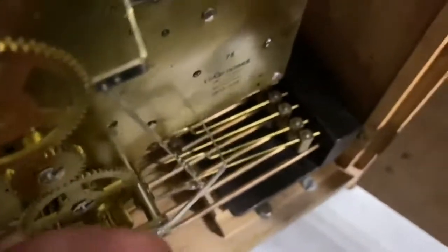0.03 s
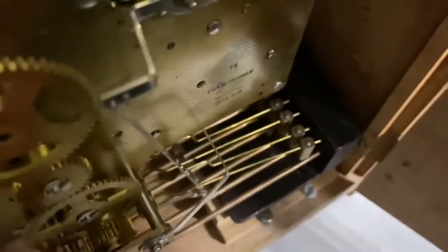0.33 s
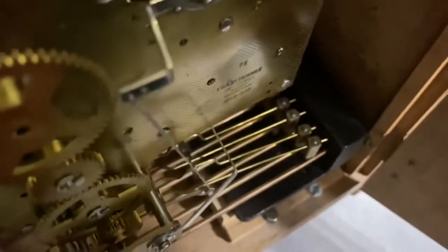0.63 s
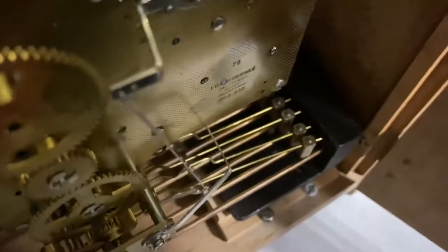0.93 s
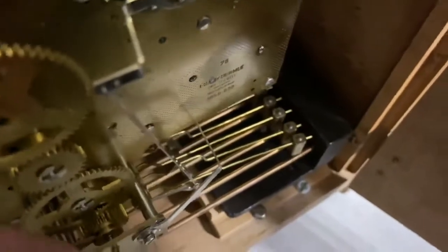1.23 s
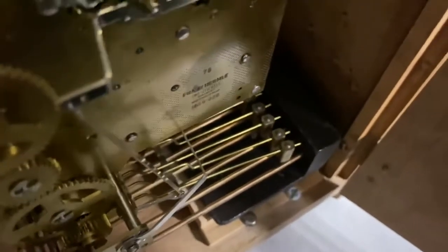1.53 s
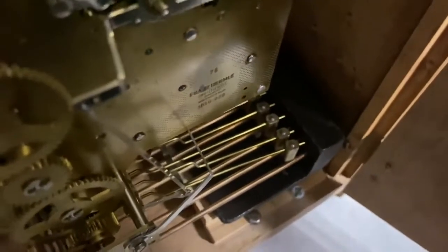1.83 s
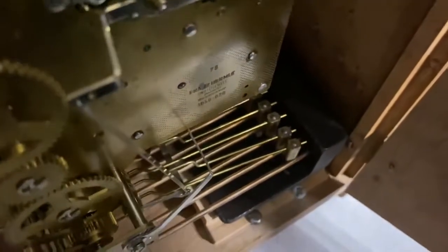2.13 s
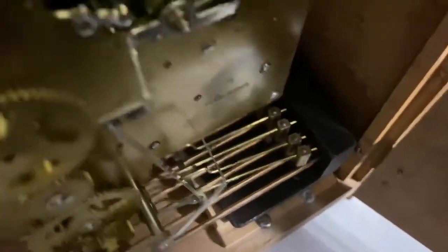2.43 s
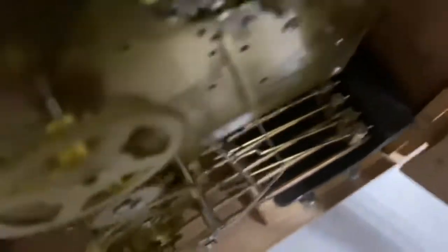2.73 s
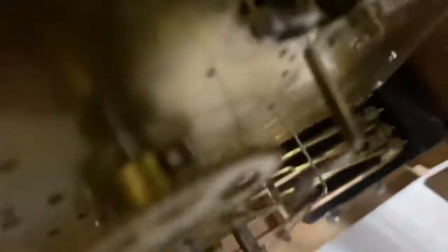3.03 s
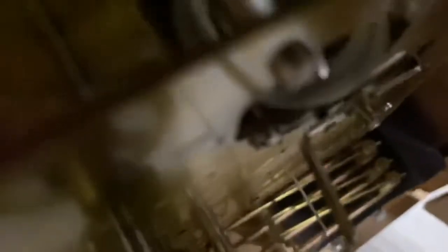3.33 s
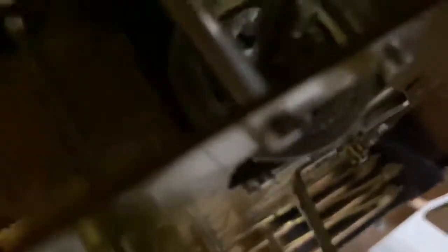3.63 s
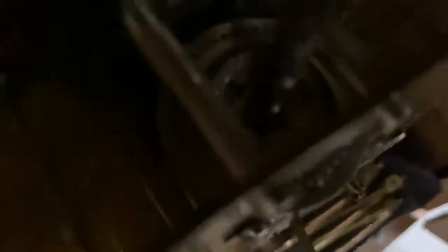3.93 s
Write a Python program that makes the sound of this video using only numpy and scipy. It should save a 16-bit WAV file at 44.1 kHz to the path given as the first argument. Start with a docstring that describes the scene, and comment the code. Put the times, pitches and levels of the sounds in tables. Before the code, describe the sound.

Close up in a softly humming room, a clock movement clacks once and ticks sparsely as its levers shift. Sharper clicks follow, the gears spin up to a steady whirr, and a single chime rings in the wooden case.

```python
"""A brass clock movement in a wooden case, close by in a humming room, reaching the left microphone first.
At 0.4 s the trip lever drops with a clack that booms in the case. Levers slide and click, then release
the strike train at 2.2 s. Its meshing teeth run up to a steady whirr, with two knocks on the way.
At 3.75 s a hammer falls on a chime rod and touches it again; the rod rings and the case shudders."""
import sys
import numpy as np
from scipy import signal
from scipy.fft import rfft, irfft
from scipy.io import wavfile
from scipy.ndimage import uniform_filter1d

SR = 44100
rng = np.random.default_rng(int(sys.argv[2]) if len(sys.argv) > 2 else 0)


def wav_out(sig):
    """Save sig, one row per channel (or a flat mono array), as 16-bit PCM at SR to the path in sys.argv[1]."""
    wavfile.write(sys.argv[1], SR, np.round(np.clip(np.atleast_2d(sig).T, -1, 1) * 32767).astype(np.int16))


N = 176400
MIC_LAG_S, LEVER_COHERENCE = 0.0004725, 0.59
TOOTH_SCATTER_DB = 1.5
# stereo balance of gears and case: f/Hz, left minus right/dB
MOVEMENT_BALANCE = [(150, 4.5), (600, 4.5), (1150, 4), (1600, 1), (2800, 0), (3900, 5), (4700, 5),
                    (6300, 0.5), (8500, 1), (10000, -0.5), (15000, 0)]


def undb(db):
    """Decibels to gain."""
    return 10 ** (np.asarray(db) / 20)


def curve(rows):
    """Straight lines through (t/s, value) rows."""
    return np.interp(np.arange(N) / SR, *np.array(rows, float).T)


def wander(rate_hz):
    """Smooth random drift, spread near 1."""
    k = int(SR / rate_hz)
    steps = np.repeat(rng.standard_normal(N // k + 1), k)
    return 1.04 * uniform_filter1d(uniform_filter1d(steps, k), k)[:N]


def band_gain(points):
    """Gain per FFT bin from (f/Hz, level/dB) points."""
    hz, db = np.array(points, float).T
    return undb(np.interp(np.log(np.arange(N // 2 + 1) * SR / N + 1), np.log(hz), db))


def colour(x, points):
    """Minimum-phase filter that keeps the power of white noise."""
    gain, n = band_gain(points), np.arange(N)
    cepstrum = irfft(np.log(gain / np.sqrt(np.mean(gain ** 2))), N)
    causal_fold = 1 + np.sign(N / 2 - n) * (n > 0)
    return irfft(rfft(x) * np.exp(rfft(cepstrum * causal_fold)), N)


def resonate(x, hz, width_hz):
    """One resonance, unit gain at its centre."""
    return signal.lfilter(*signal.iirpeak(hz, hz / width_hz, fs=SR), x)


def narrow_noise(hz, width_hz):
    """Noise-driven resonance at unit RMS."""
    x = resonate(resonate(rng.standard_normal(N), hz, width_hz), hz, width_hz)
    return x / np.std(x)


def noise_pair(coherence):
    """Partly correlated left and right noise."""
    common = np.sqrt(coherence) * rng.standard_normal(N)
    return common + np.sqrt(1 - coherence) * rng.standard_normal((2, N))


def pan(db):
    """Left and right gains for a level difference."""
    return undb(np.array([[db], [-db]]) / 2)


def mics(x, balance=((100, 0), (1000, 0))):
    """Two microphones, balanced by band; the right one lags, but the top treble is in step."""
    gain, hz = np.sqrt(band_gain(balance)), np.arange(N // 2 + 1) * SR / N
    lag_cycles = np.minimum(hz * MIC_LAG_S, 3)
    return irfft(rfft(x) * np.array([gain, np.exp(-2j * np.pi * lag_cycles) / gain]), N)


def fade(t, t60_s):
    """Exponential decay from t = 0."""
    return (t >= 0) * np.exp(-np.log(1000) * np.maximum(t, 0) / t60_s)


def attack(t, rise_ms):
    """Build-up of a contact, 0 to 1."""
    return 1 - np.exp(-(np.maximum(t, 0) * 1000 / rise_ms) ** 2)


def ring(modes, t, tilt_db_oct=0):
    """Struck modes of alternating sign at both microphones, tilted about 600 Hz."""
    t = np.array([t, t - MIC_LAG_S])
    out = 0
    for k, (hz, db, t60_s, pan_db) in enumerate(modes):
        gain = (-1) ** k * undb(db + tilt_db_oct * np.log2(hz / 600)) * pan(pan_db)
        out += gain * fade(t, t60_s) * np.sin(2 * np.pi * hz * t)
    return out


def add(out, start_s, sound):
    """Mix a sound in at start_s."""
    at = int(start_s * SR)
    out[..., at:at + sound.shape[-1]] += sound[..., :N - at]


def gears():
    """Meshing teeth pulse a noise that rings wheels and plates; a thin whine follows the speed."""
    # train speed: t/s, tooth rate/Hz
    speed = [(2.24, 50), (2.35, 95), (2.45, 124), (2.6, 150), (2.75, 180), (2.9, 204), (3.05, 215),
             (3.3, 221), (3.55, 211), (3.72, 214), (4, 208)]
    # whirr spectrum: f/Hz, level/dB
    spectrum = [(150, 3), (260, 7.5), (560, 2.5), (850, 3), (1150, 8.5), (1550, 0.5), (2200, 0.5),
                (2900, 3), (3500, 7), (4650, -4.5), (5500, -5), (6500, -1.5), (7600, -6.5), (8600, -2),
                (9300, -3.5), (10150, 2), (10900, -8.5), (12200, -13), (14000, -1.5), (15100, -15),
                (15700, -8)]
    # wheel resonances: f/Hz, width/Hz, level/dB
    wheel_modes = [(1043, 17, 10.5), (1286, 15, -9), (1865, 40, 6), (2660, 23, -3)]
    # their gain: t/s, level/dB
    wheel_gain = [(2.3, -5), (2.7, 10), (2.95, -5), (3.3, 1.5), (3.6, 10.5), (4, 14.5)]
    # plate resonances: f/Hz, width/Hz, level/dB
    plate_modes = [(3847, 120, 5.5), (4050, 78, 3), (4544, 83, 6.5), (6070, 300, -10)]
    # their gain: t/s, level/dB
    plate_gain = [(2.3, -9), (2.55, -2), (2.8, 5), (3.3, 5.5), (3.55, 1.5), (4, 7)]
    # whine tones: multiple of tooth rate, level/dB, left minus right/dB
    tones = [(.4, -53.5, 2), (5, -53.5, 17)]
    start_s, full_speed_hz = speed[0][0], 215
    t, tooth_hz = np.arange(N) / SR, curve(speed)
    teeth = np.cumsum(tooth_hz) / SR
    drive = np.clip((t - start_s) / 0.036, 0, 1) * (tooth_hz / full_speed_hz) ** 1.07
    force = undb(TOOTH_SCATTER_DB * rng.standard_normal(N // 100))[teeth.astype(int)]
    pulses = .8 + force * np.exp(-(teeth % 1) / .25)  # steady bed plus one pulse per tooth
    mesh = noise_pair(0.31) * pulses / np.sqrt(np.mean(pulses ** 2))
    whirr = colour(mesh, spectrum)
    for modes, gain in (wheel_modes, wheel_gain), (plate_modes, plate_gain):
        ringing = sum(undb(db) * resonate(mesh, hz, width_hz) for hz, width_hz, db in modes)
        whirr += ringing * undb(curve(gain))
    whirr = undb(-45.5) * mics(whirr, MOVEMENT_BALANCE)
    cycles = teeth + .035 * wander(60) - np.array([[0], [MIC_LAG_S]]) * tooth_hz
    whine = sum(undb(db + 3 * wander(30.32)) * pan(pan_db) * np.sin(2 * np.pi * k * cycles)
                for k, db, pan_db in tones)
    return drive * whirr + drive ** 6 * whine + tooth_ticks(teeth, start_s)


def tooth_ticks(teeth, start_s):
    """Each tooth lands with a tiny tick, hard or soft as a slower wheel comes round."""
    # metallic tick modes: f/Hz, level/dB, t60/s
    modes = [(6480, -40.5, .006), (10200, -35, .006)]
    # tick gain: t/s, level/dB
    gain = [(2.3, -31), (2.65, -17), (2.8, -0.5), (3.45, 5.5), (3.65, -1), (4, -14)]
    t, turns_per_tooth = np.arange(SR // 50) / SR, .282
    landings = np.diff(np.floor(teeth), prepend=0) * (np.arange(N) / SR > start_s)
    pressure = (1 + np.sin(2 * np.pi * turns_per_tooth * teeth)) / 2
    blows = landings * pressure * undb(curve(gain) + TOOTH_SCATTER_DB * rng.standard_normal(N))
    tick = sum(undb(db) * fade(t, t60_s) * np.sin(2 * np.pi * hz * t) for hz, db, t60_s in modes)
    return mics(signal.fftconvolve(blows, attack(t, rise_ms=.7) * tick)[:N])


def chime(strike_s, retouch_s):
    """The rod rings in beating pairs; the hammer's second touch shifts energy to the upper modes."""
    # rod partials: f/Hz
    partials_hz = [511, 1023, 1516.5, 3039.5, 5082, 6077, 14142]
    # per partial: level/dB, t60/s, beat/Hz, beat depth, step at second touch/dB, left minus right/dB
    partials = [(-15.5, .9, 9.4, .35, -4, 5.5), (-41, .68, 5, .26, -9, 11), (-27.5, 1.33, 8, .4, .5, 7.5),
                (-42, 1.8, 5.2, .27, 3, 13), (-48.5, 2.5, 6.6, .6, 0, 3), (-51, .8, 3.2, .45, 7, 3),
                (-56, 3, 9, .3, 4, 0)]
    lag_s, rise_s, beat_peak_s = 0.00036, 0.0042, 0.041
    t = np.arange(N) / SR - strike_s - np.array([[0], [lag_s]])
    touched = np.clip((t + strike_s - retouch_s) / 0.0033, 0, 1)
    out = 0
    for hz, (db, t60_s, beat_hz, depth, touch_db, pan_db) in zip(partials_hz, partials):
        twin = depth * np.sin(2 * np.pi * (hz * t + beat_hz * (t - beat_peak_s)))
        pair = np.sin(2 * np.pi * hz * t) + twin
        out += undb(db + touch_db * touched) * pan(pan_db) * fade(t, t60_s) * pair
    return out * np.clip(t / rise_s, 0, 1)


def shudder(strike_s):
    """The struck rod shakes the case into a rough, dying rumble."""
    # case resonances: f/Hz, width/Hz, level/dB
    bands = [(310, 150, -1), (433, 29, 1.5), (826, 200, -7.5), (1077, 31, -2.5)]
    t = np.arange(N) / SR - strike_s
    body = sum(undb(db) * narrow_noise(hz, width_hz) for hz, width_hz, db in bands)
    envelope = np.clip(t / .02, 0, 1) * fade(t, t60_s=1)
    return mics(body * envelope * undb(-38.5 + wander(70)), MOVEMENT_BALANCE)


def clicks():
    """Each contact cracks and rings a brass part and the wooden case; some set a small part pinging."""
    # clicks and knocks: t/s, wood/dB, wood tilt/(dB/octave), brass/dB, crack/dB, rise/ms
    contacts = [(.382, -42.5, -4.5, -46, -51, 4), (0.589, -66, 4, -64, -66.5, 0.65),
                (1.2654, -41.5, -8.5, -57, -62, 0.74), (1.547, -43.5, -8, -73, -49, 0.46),
                (2.013, -43.5, 1.5, -38.5, -49, 0.5), (2.031, -57, 9, -52, -47, 1.2),
                (2.042, -45.5, -4, -45, -51, 0.75), (2.0665, -35.5, 10.5, -24.5, -21, 4.1),
                (2.084, -40.5, 3, -30.5, -33, 1.5), (2.113, -45, 2, -34, -52, 3.8),
                (2.1278, -28.5, 3, -39, -18, 1.5), (2.146, -42, 1, -29, -47, 0.64),
                (2.205, -42, 3.5, -33, -33.5, 0.55), (2.219, -52, 9, -57, -47, 1.4),
                (2.2321, -22, -0.5, -14.5, -12.5, 1.64), (2.252, -22.5, 1.5, -23, -17, 1.8),
                (2.275, -34, 4, -31, -34, 0.89), (2.684, -31.5, 3, -30, -30.5, 2.2),
                (3.203, -26.5, 3, -38, -26, 0.67), (3.349, -46.5, -8.5, -60, -54, 1.7),
                (3.699, -40.5, -4, -64, -60, 2.2), (3.749, -22.5, 0.5, -29, -24, 6.7),
                (3.805, -42.5, 10.5, -52, -56, 4), (3.859, -36, 1.5, -56, -52, 3)]
    # crack spectrum: f/Hz, level/dB
    spectrum = [(100, -10), (300, 2), (600, 11), (1000, 4.5), (1400, 2), (2100, -0.5), (2650, 5),
                (3000, 5.5), (3500, 3.5), (5000, 5), (8200, -2), (10700, 5), (12200, -13), (13400, 6),
                (14400, 3.5), (15400, -3.5), (16200, -18)]
    # wooden case modes: f/Hz, level/dB, t60/s, left minus right/dB
    case_modes = [(209, -20, 0.13, -10), (236.5, -20, 0.64, 2), (314, -13, 0.1, 7.5), (384.5, -15, 0.41, 3),
                  (476.3, -1, 0.081, 3), (545, -1.5, 0.11, 1), (625, 0.5, 0.039, 3),
                  (732.3, -0.5, 0.093, 8), (834.5, -9.5, 0.16, 11.5), (935, 1, 0.062, 4),
                  (1068, -10, 0.065, 23), (1231, -1, 0.071, 5.5), (1835, -13.5, 0.079, -0.5),
                  (2085, -19, 0.116, 4)]
    # brass plate and lever modes: f/Hz, level/dB, t60/s, left minus right/dB
    brass_modes = [(1850, -11, .03, 1), (2675, -3, .03, 0), (3520, -1, .025, 4), (4245, -4, .025, 2),
                   (4770, -5, .025, 2), (5630, -11, .03, 4), (6080, -9, .025, 2), (7480, -11, .025, 3),
                   (10700, -6, .02, 1)]
    # parts ringing on alone: t/s, f/Hz, level/dB, t60/s
    pings = [(.438, 5840, -61.5, 0.55), (.438, 6900, -56.5, .33), (2.233, 2667, -19.5, 0.059),
             (1.267, 373, -44, 0.57), (1.547, 4840, -33.5, 0.022), (3.749, 1115, -13.5, 0.12),
             (3.752, 307.8, -41.5, 1)]
    t = np.arange(SR // 2) / SR
    out = cracks(contacts, spectrum)
    for start_s, wood_db, tilt_db_oct, brass_db, _, rise_ms in contacts:
        # each brass part differs a little in pitch and colour
        part = [(hz * (1 + .06 * rng.standard_normal()), db + 3 * rng.standard_normal(), t60_s, pan_db)
                for hz, db, t60_s, pan_db in brass_modes]
        brass = undb(brass_db) * ring(part, t)
        wood = undb(wood_db) * ring(case_modes, t, tilt_db_oct)
        add(out, start_s, attack(t, rise_ms) * (wood + brass))
    for start_s, hz, db, t60_s in pings:
        add(out, start_s, attack(t, rise_ms=0.62) * ring([(hz, db, t60_s, 6)], t))
    return out


def trip_lever():
    """The trip lever drops back with a double clack that booms in the case."""
    # lever catches: t/s, ring/dB, crack/dB, rise/ms
    catches = [(.416, -32, -28.5, 1.6), (0.4217, -24, -22, 1.6), (.437, -22, -22, 1.26)]
    # modes of the lever on the case: f/Hz, level/dB, t60/s, left minus right/dB
    modes = [(132, -25, 0.17, 0.5), (208.6, -20, 0.32, -7), (237.8, -15, 0.43, 6.5), (328.3, -15, 0.2, 0.5),
             (382, -18, 0.5, 0), (494.5, 0.5, 0.14, 2.5), (572, -8, 0.087, -1.5), (647, 1, 0.066, -1.5),
             (715, -9.5, 0.077, 0.5), (1002, -15, 0.13, 6.5), (1260, -8.5, 0.14, 2.5),
             (1829, -14, 0.082, -2), (2280, -17, 0.15, 4), (2460, -15, 0.071, -5)]
    # crack spectrum: f/Hz, level/dB
    spectrum = [(100, 1.5), (300, 9.5), (600, 12), (900, 0.5), (1600, 3), (2400, 3.5), (3100, -0.5),
                (4300, -2.5), (5600, 1), (8000, -2.5), (12000, -4), (14500, -3), (16000, -6.5)]
    t = np.arange(SR // 2) / SR
    out, body = cracks(catches, spectrum), ring(modes, t)
    for start_s, ring_db, _, rise_ms in catches:
        add(out, start_s, undb(ring_db) * attack(t, rise_ms) * body)
    return out


def cracks(contacts, spectrum):
    """Contact noise: a faint hiss swelling just before each crack, the crack, a rattling tail."""
    # stereo balance of the cracks: f/Hz, left minus right/dB
    balance = [(200, 17.5), (1000, 20), (1800, 1), (5000, 12), (14000, -3)]
    t, power = np.arange(-SR // 20, SR // 2) / SR, np.zeros(N)
    lead_in = undb(-19) * np.exp(-abs(t) / 0.0035)
    crack, rattle = fade(t, t60_s=.027), undb(-18) * fade(t, t60_s=.12)
    for start_s, *_, db, rise_ms in contacts:
        blow = attack(t, rise_ms) * (crack + rattle)
        add(power, start_s + t[0], undb(db) ** 2 * (blow ** 2 + lead_in ** 2))
    return mics(colour(noise_pair(LEVER_COHERENCE) * np.sqrt(power), spectrum), balance)


def lever_slides():
    """Levers slide with a faint, uneven scrape; some parts sing along."""
    # slides: t/s, width/s, level/dB
    slides = [(.8, 0.094, -66.5), (1.14, 0.03, -66), (1.536, 0.018, -62), (1.7, 0.8, -80.5),
              (2.11, 0.064, -43)]
    # scrape spectrum: f/Hz, level/dB
    spectrum = [(200, 9), (1500, 16), (2300, -5.5), (3050, 9.5), (3800, -5.5), (4950, 6.5), (5700, 1),
                (6500, -9), (8000, -13.5), (15000, -16.5)]
    # singing parts: t/s, width/s, f/Hz, width/Hz, level/dB
    parts = [(.905, 0.04, 770, 110, -62), (.88, 0.19, 3400, 31, -76.5)]
    t = np.arange(N) / SR
    swell = sum(undb(db) * np.exp(-((t - peak_s) / width_s) ** 2) for peak_s, width_s, db in slides)
    singing = sum(undb(db) * np.exp(-((t - peak_s) / width_s) ** 2) * narrow_noise(hz, width_hz)
                  for peak_s, width_s, hz, width_hz, db in parts)
    friction = noise_pair(LEVER_COHERENCE) * swell * undb(3.3 * wander(89))
    return mics(singing + colour(friction, spectrum))


def reverb(x):
    """The room's short, dull tail."""
    # tail spectrum: f/Hz, level/dB
    spectrum = [(100, 14), (300, 5.5), (700, 1), (1500, 0.5), (5000, -9.5), (15000, -47)]
    t = np.arange(N) / SR
    tail = colour(rng.standard_normal((2, N)) * fade(t - .006, t60_s=0.27), spectrum)[:, :SR]
    tail /= np.sqrt(np.sum(tail ** 2) / 2)
    return undb(-20.5) * signal.fftconvolve(x, tail, axes=1)[:, :N]


def room_hum():
    """A low, slightly wavering hum over dull room noise."""
    # hum tones: f/Hz, level/dB, waver/dB
    tones = [(57.7, -38, .7), (86.5, -60, 3), (108.5, -55, 2), (120, -49, .5), (176, -69, 2), (235, -62, 3),
             (262, -58, 1)]
    # hum gain: t/s, level/dB
    gain = [(0, 2), (.8, 1), (1.45, 0), (2.1, 2.5), (2.6, 3.5), (2.9, 1), (3.3, 3.5), (4, 3)]
    # room noise spectrum: f/Hz, level/dB
    spectrum = [(20, 5), (55, 0.5), (90, 7.5), (150, -12), (240, -2.5), (400, -11.5), (700, -23.5),
                (1300, -25.5), (2200, -39.5), (6000, -46.5), (10000, -55), (16000, -68)]
    t, hum = np.arange(N) / SR, 0
    for hz, db, waver_db in tones:
        amplitude = undb(db + waver_db * wander(4.66))
        drift_rad = waver_db * wander(2.5) / 10
        hum += amplitude * np.sin(2 * np.pi * hz * t + drift_rad)
    return hum * undb(curve(gain)) + undb(-51) * colour(noise_pair(0.48), spectrum)


def scene():
    """The movement and its case in the room."""
    strike_s = 3.752
    clock = trip_lever() + clicks() + lever_slides() + gears()
    clock += chime(strike_s, retouch_s=3.807) + shudder(strike_s)
    return clock + reverb(clock) + room_hum()


def record(dry):
    """Steep low-pass at 15.7 kHz."""
    return signal.sosfilt(signal.ellip(8, .2, 70, 15700, fs=SR, output="sos"), dry)


dry = scene()
out = record(dry)
wav_out(out)
```